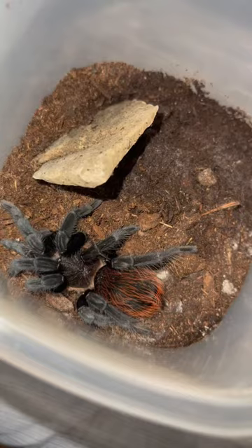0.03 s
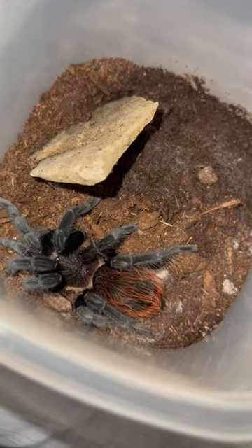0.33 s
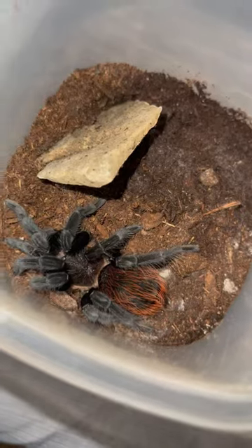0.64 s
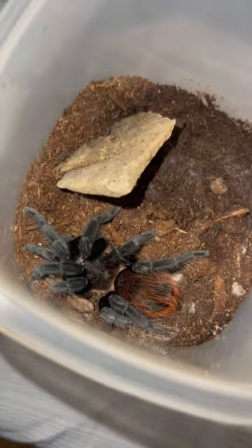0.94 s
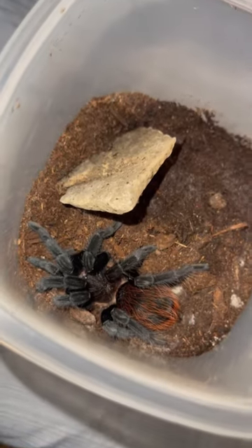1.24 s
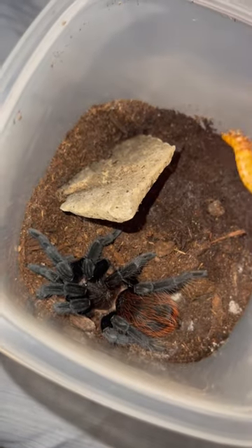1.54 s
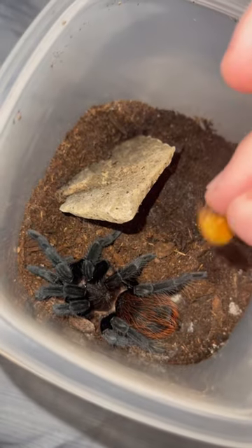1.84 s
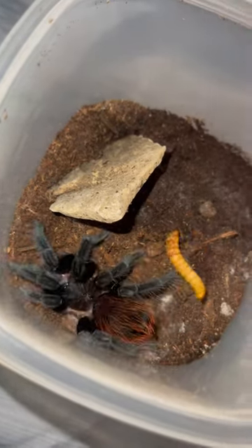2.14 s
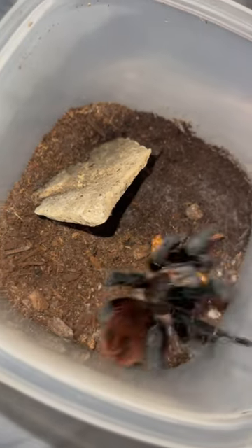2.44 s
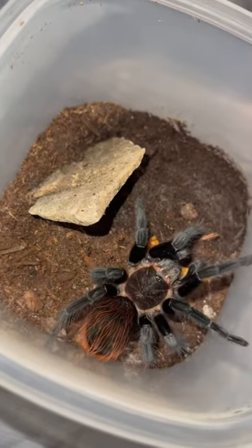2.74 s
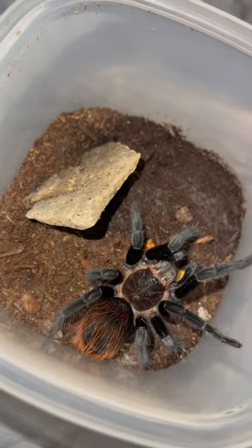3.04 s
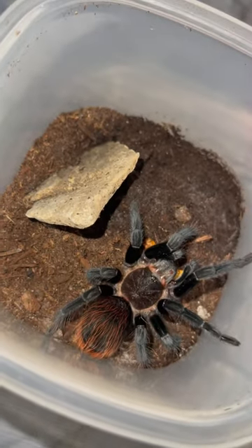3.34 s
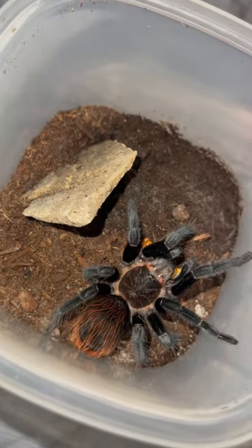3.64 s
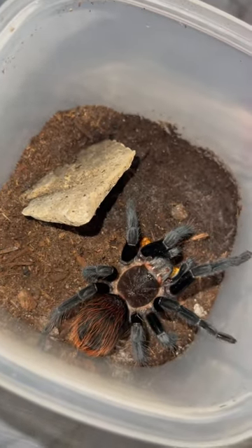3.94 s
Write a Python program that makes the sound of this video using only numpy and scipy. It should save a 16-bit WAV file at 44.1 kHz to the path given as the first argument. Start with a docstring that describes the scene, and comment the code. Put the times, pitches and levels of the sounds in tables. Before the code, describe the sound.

One sharp, very brief tap on a plastic tub sounds at about 2.3 seconds as a tarantula lunges, with a light tick just before and a short room tail. Faint handling ticks come around 0.9 to 1.9 seconds and again near 3.5, with a soft low microphone bump at 1.8. Barely audible soil scuffs surround the strike. Low room rumble and a gently throbbing appliance hum run throughout the four seconds.

```python
"""A tarantula lunges at a larva in a plastic tub of soil, close to a hand-held phone in a quiet room.
A light tick and one sharp tap ring the tub wall and leave a short room tail. Legs and larva scuff the
dry soil; faint handling ticks, rubs and a low bump of the hand come and go near the microphone.
Behind them lie a steady room rumble and an appliance's hum, all in the phone's stereo image."""
import sys
import numpy as np
from scipy import signal
from scipy.fft import rfft, irfft
from scipy.io import wavfile

SR = 44100
rng = np.random.default_rng(int(sys.argv[2]) if len(sys.argv) > 2 else 0)


def generate_wav(sig):
    """Save sig (samples, or channels by samples) to the path in sys.argv[1] as 16-bit PCM at SR."""
    pcm = np.round(np.clip(np.atleast_2d(sig).T, -1, 1) * 32767).astype(np.int16)
    wavfile.write(sys.argv[1], SR, pcm)


N = 176400
TIME_S = np.arange(N) / SR
FREQ_HZ = np.arange(N // 2 + 1) * SR / N


def lunge():
    """Each tap is a hard click, a brief ring and thump of the tub, and a diffuse room tail."""
    # taps on the tub: start_s, click_db, tilt_db_per_octave, ring_db, best_excited_hz, thump_db
    taps = [(2.2627, -32.5, 18, -38.5, 1290, -52), (2.3064, -8.5, 1.5, -36.5, 2600, -56)]
    # spectrum of the click: frequency_hz, gain_db
    click_spectrum = [(450, -4.5), (820, 3.5), (1250, -6), (1700, -22.5), (2500, -19), (3350, 1.5),
                      (4100, -9.5), (4800, -4.5), (5900, -6.5), (7400, -1), (9300, -2), (11200, -3),
                      (12200, -19), (13500, -40)]
    # modes of the soil-damped tub: pitch_hz, level_db, t60_s
    tub_modes = [(780, 2.5, 0.0094), (2020, -3, 0.0036), (2870, -9, 0.0066), (3460, -1, 0.0067),
                 (4640, -5.5, 0.0036), (5420, 6, 0.0065)]
    # spectrum of the room tail: frequency_hz, gain_db
    tail_spectrum = [(150, -26), (500, 20), (1500, -28), (2500, 1.5), (4500, 4), (7000, 8.5), (9000, -8.5),
                     (11000, 4), (12200, -10), (13000, -39)]
    contact_octaves = 1.11  # modes this far from the best excited pitch still ring
    click_floor_hz = 640  # the click and ring carry little sound below this
    thump_hz, tail_db, tail_side_db = 156.2, -21, -5.5
    clicks, ring, thump, tail = np.zeros((4, N))
    for start, click_db, tilt_db, ring_db, best_hz, thump_db in taps:
        age = TIME_S - start
        impulse = signal.unit_impulse(N, int(start * SR))
        clicks += undb(click_db) * tilt(impulse, tilt_db)
        for hz, db, t60_s in tub_modes:
            excited = np.exp(-(np.log2(hz / best_hz) / contact_octaves) ** 2)
            ring += excited * undb(ring_db + db) * fade(start, t60_s) * np.sin(2 * np.pi * hz * age)
        thump += undb(thump_db) * fade(start, t60_s=0.11) * np.sin(2 * np.pi * thump_hz * age)
        tail += undb(click_db + tail_db) * room_decay(start, t60_s=0.28)
    diffuse = undb(tail_side_db) * tail * noise_pair(tail_spectrum)
    direct = wall_bending(low_cut(colour(clicks, click_spectrum) + ring, click_floor_hz))
    return stereo_image(direct + thump + tail * noise(tail_spectrum)) + diffuse


def wall_bending(x, delay_s=0.000535, at_hz=10000):
    """Bending waves in the plastic wall: the delay falls as one over the root of frequency."""
    turns = 2 * delay_s * np.sqrt(FREQ_HZ * at_hz)
    return irfft(rfft(x) * np.exp(-2j * np.pi * turns), N)


def soil_scuffs():
    """Larva and legs scuff the dry soil."""
    # scuffs: centre_s, half_length_s, level_db
    scuffs = [(1.92, 0.041, -75.5), (2.2, 0.042, -76.5), (2.257, 0.015, -71), (2.34, 0.05, -73)]
    # spectrum of a scuff: frequency_hz, gain_db
    spectrum = [(1500, 0), (4000, -4), (8000, -17), (10000, 5), (11300, 6), (12200, -9), (13200, -26)]
    return rustle(scuffs, spectrum)


def handling_ticks(tail_db=-9.5):
    """Handling makes tiny sharp clicks, each with a faint room tail."""
    # handling ticks: start_s, level_db
    ticks = [(0.8945, -53.5), (1.1404, -40), (1.517, -50), (1.916, -48), (2.2015, -54), (3.425, -56),
             (3.683, -53.5)]
    # spectrum of a tick: frequency_hz, gain_db
    spectrum = [(1000, -8), (3000, -5.5), (4300, 0.5), (5400, 6), (6500, 1.5), (7600, -7.5), (8800, -11.5),
                (9900, 1.5), (10900, 2.5), (11800, -17.5), (13000, -41.5)]
    clicks, tail = np.zeros((2, N))
    for start, db in ticks:
        clicks[int(start * SR)] = undb(db)
        tail += undb(db + tail_db) * room_decay(start, t60_s=0.16)
    return stereo_image(colour(clicks, spectrum)) + tail * noise_pair(spectrum)


def tub_rubs(room_share=0.55):
    """Fingers and legs brush the tub, heard partly direct and partly by way of the room."""
    # brushes: centre_s, half_length_s, level_db
    rubs = [(1.465, 0.025, -72.5), (1.515, 0.018, -76), (1.925, 0.018, -75), (2.38, 0.039, -70.5),
            (3.275, 0.014, -75), (3.295, 0.062, -79)]
    # spectrum of a rub, with the resonances of the tub wall: frequency_hz, gain_db
    spectrum = [(1000, -8.5), (2800, -4), (3450, 2.5), (3950, -1), (4600, 4.5), (5150, -1), (5550, -0.5),
                (6300, -8), (11000, -34), (13000, -30)]
    diffuse = swell(rubs) * noise_pair(spectrum)
    return np.sqrt(1 - room_share) * rustle(rubs, spectrum) + np.sqrt(room_share) * diffuse


def hand_bump():
    """The hand bumps the phone: a low thud right at the microphone."""
    # bump: centre_s, half_length_s, level_db
    bumps = [(1.76, 0.06, -48.5)]
    # spectrum of the bump: frequency_hz, gain_db
    spectrum = [(20, -20), (38, -8), (58, 6), (85, 2), (200, -37), (600, -81)]
    return rustle(bumps, spectrum)


def rustle(events, spectrum, grains_per_s=3500, spread_db=4.5):
    """Dense friction grains close to the phone swell and die away with each movement."""
    grains = (rng.random(N) < grains_per_s / SR) * rng.standard_normal(N)
    grains *= undb(spread_db * rng.standard_normal(N))
    return stereo_image(swell(events) * unit(colour(grains, spectrum)))


def appliance_hum():
    """A steady hum with a beating drone that throbs in short swells."""
    # hum lines: pitch_hz, level_db, wavering_share
    hum_lines = [(57.87, -51.5, 0.25), (119.7, -52.5, .7), (344.6, -68, 0.39), (483.2, -71, 0.62),
                 (840, -79.5, 0.71), (1464, -85.5, 0.58), (1733, -88, 0.46), (2524, -91, 0.29)]
    # close pair of hum lines that beat, a motor and the mains: pitch_hz, level_db, wavering_share
    drone_lines = [(170.5, -55, 0.3), (178.1, -53.5, 0.3)]
    # swells of the drone: centre_s, half_length_s, level_db
    swells = [(.39, 0.043, -44.5), (.66, .03, -46.5), (.85, 0.02, -43.5), (.94, 0.037, -43),
              (1.08, 0.021, -45), (1.255, 0.051, -40), (1.42, 0.055, -41), (1.53, 0.018, -39.5),
              (1.66, 0.026, -43), (1.87, 0.047, -46), (2.18, 0.028, -47), (2.27, 0.02, -37),
              (2.41, 0.053, -44), (3.01, .025, -47), (3.14, 0.04, -45.5), (3.3, 0.053, -45),
              (3.4, 0.015, -39.5), (3.61, 0.027, -41), (3.83, 0.021, -41.5), (3.985, 0.022, -46)]
    swell_hz, drift_hz, waver_hz = 171.3, 3.94, 5.7
    phase = 2 * np.pi * np.cumsum(swell_hz + drift_hz * waver(waver_hz)) / SR
    throb = swell(swells) * unit(np.sin(phase))
    return hum_tones(hum_lines, waver_hz) + hum_tones(drone_lines, waver_hz) + throb


def hum_tones(lines, waver_hz):
    """Hum lines that waver in level and phase."""
    tones = np.zeros(N)
    for hz, db, share in lines:
        swing = 1 + share * (waver(waver_hz) + 1j * waver(waver_hz))
        carrier = np.exp(2j * np.pi * (hz * TIME_S + rng.random()))
        tones += undb(db) * unit((swing * carrier).real)
    return tones


def room_tone(rumble_db=-47, diffuse_db=-63):
    """Rumble and hum, centred in the bass, diffuse and leaning left in the middle range."""
    # rumble common to both channels: frequency_hz, gain_db
    rumble_spectrum = [(20, -34.5), (42, -22), (60, -5.5), (85, 1), (110, -1.5), (140, -2.5), (170, -1),
                       (215, -4), (300, -10.5), (480, -13.5), (650, -23.5), (900, -27), (1150, -33),
                       (1700, -32), (2600, -41), (3800, -48), (4900, -52.5), (6200, -56), (8500, -58.5),
                       (11200, -52), (12200, -61.5), (13200, -82)]
    # diffuse rumble, opposite in the two channels: frequency_hz, gain_db
    diffuse_spectrum = [(30, -25.5), (100, -13.5), (200, -5.5), (330, -3), (500, -1), (700, -4.5),
                        (1100, -9.5), (1800, -25.5), (2600, -20), (4000, -45.5), (6000, -56.5)]
    # how much louder the room is on the left: frequency_hz, excess_db
    left_bias = [(60, .1), (170, .4), (330, 2.3), (650, 1.1), (1200, 0), (2500, .5), (5000, 0)]
    common = stereo_image(undb(rumble_db) * flicker(noise(rumble_spectrum)) + appliance_hum())
    side = undb(diffuse_db) * noise(diffuse_spectrum)
    stereo = common + np.array([side, -side])
    lean_db = curve_db(left_bias) / 2
    return irfft(rfft(stereo) * undb([lean_db, -lean_db]), N)


def flicker(x, depth_db=1.3, rate_hz=12):
    """Each third of an octave in the middle range wavers in level on its own."""
    edges_hz = np.geomspace(400, 4000, 11)
    spectrum = rfft(x)
    for low, high in zip(edges_hz, edges_hz[1:]):
        band = irfft(spectrum * (FREQ_HZ >= low) * (FREQ_HZ < high), N)
        gain = unit(undb(depth_db * waver(rate_hz)))
        x = x + band * (gain - 1)
    return x


def room_decay(start, t60_s, delay_s=0.0023):
    """Envelope of a room tail, of energy 1, arriving just after the direct sound."""
    decay = fade(start + delay_s, t60_s)
    return decay / np.linalg.norm(decay)


def stereo_image(x):
    """The phone's stereo image: channels alike in the bass, the right shifted in phase in the treble."""
    # phase shift of the right channel: frequency_hz, phase_rad
    right_phase = [(0, 0), (2400, 0), (3400, 1.2), (4500, 1.8), (4950, 3.14), (5500, 5.9), (9050, 9.42),
                   (12400, 12.4)]
    shift = np.interp(FREQ_HZ, *np.array(right_phase).T)
    return np.array([x, irfft(rfft(x) * np.exp(-1j * shift), N)])


def undb(db):
    """Decibels to gain."""
    return 10 ** (np.asarray(db) / 20)


def unit(x):
    """Scale to rms 1."""
    return x / np.sqrt(np.mean(x ** 2))


def curve_db(points):
    """Join (frequency_hz, gain_db) points along a log frequency axis."""
    hz, db = np.array(points, float).T
    return np.interp(np.log(FREQ_HZ + 1), np.log(hz), db)


def colour(x, spectrum):
    """Causal filter with the given spectrum; keeps the power of white noise."""
    gain = unit(undb(curve_db(spectrum)))
    cepstrum = irfft(np.log(gain), N)
    cepstrum[1:N // 2] *= 2  # fold to minimum phase
    cepstrum[N // 2 + 1:] = 0
    return irfft(rfft(x) * np.exp(rfft(cepstrum)), N)


def tilt(x, db_per_octave):
    """Tip the spectrum about 8 kHz."""
    octaves = np.log2(np.clip(FREQ_HZ, 1000, 12000) / 8000)
    return irfft(rfft(x) * undb(db_per_octave * octaves), N)


def low_cut(x, hz):
    """Second-order high-pass."""
    return signal.sosfilt(signal.butter(2, hz, "high", fs=SR, output="sos"), x)


def noise(spectrum):
    """Coloured noise of rms 1."""
    return unit(colour(rng.standard_normal(N), spectrum))


def noise_pair(spectrum):
    """Diffuse sound: independent noise in each channel."""
    return np.array([noise(spectrum), noise(spectrum)])


def waver(hz):
    """Slow random motion of rms 1 with changes up to about hz."""
    return unit(irfft(rfft(rng.standard_normal(N)) / (1 + (FREQ_HZ / hz) ** 2), N))


def fade(start, t60_s):
    """Sudden onset and exponential decay."""
    age = TIME_S - start
    return (age >= 0) * np.exp(-np.log(1000) * np.maximum(age, 0) / t60_s)


def swell(events):
    """Level that rises and falls smoothly around each event."""
    return sum(undb(db) * np.exp(-((TIME_S - centre) / half) ** 2) for centre, half, db in events)


def scene():
    """The lunge and small movements close up, over the room tone."""
    return lunge() + handling_ticks() + tub_rubs() + soil_scuffs() + hand_bump() + room_tone()


def record(dry):
    """The sound fades in after a brief silence, with the deepest bass and top treble cut."""
    start_s, ramp_s, bottom_hz, top_hz = 0.036, 0.002, 22, 13300
    fade_in = np.clip((TIME_S - start_s) / ramp_s, 0, 1)
    high_cut = signal.ellip(8, 0.2, 70, top_hz, fs=SR, output="sos")
    return signal.sosfilt(high_cut, low_cut(dry, bottom_hz) * fade_in)


dry = scene()
out = record(dry)
generate_wav(out)
```